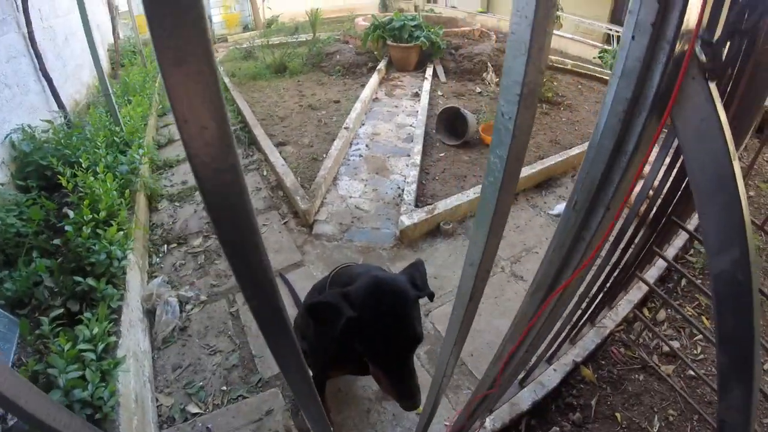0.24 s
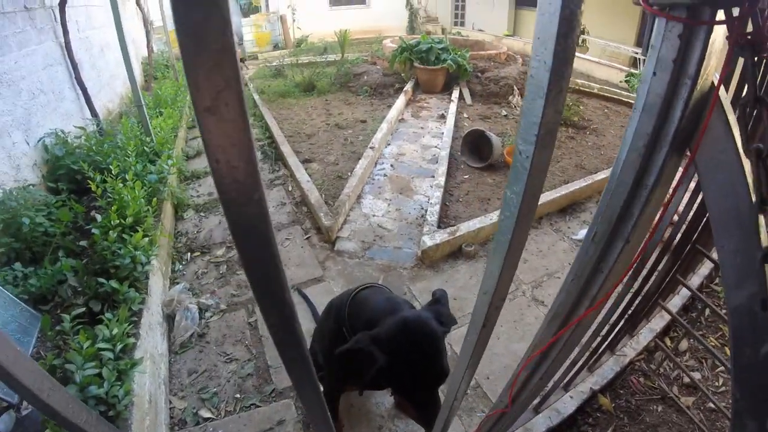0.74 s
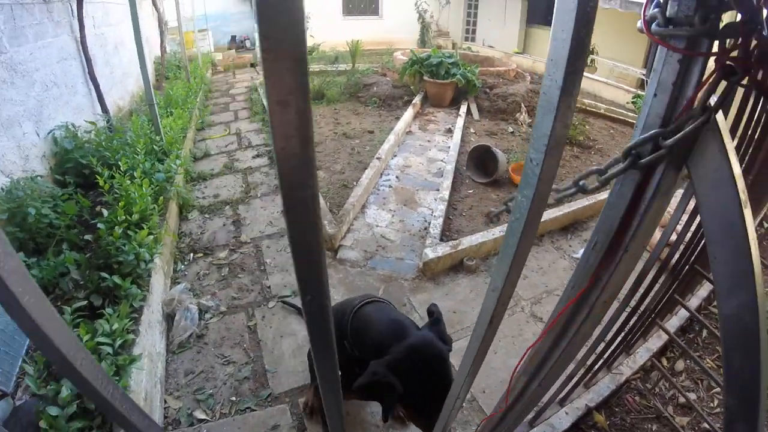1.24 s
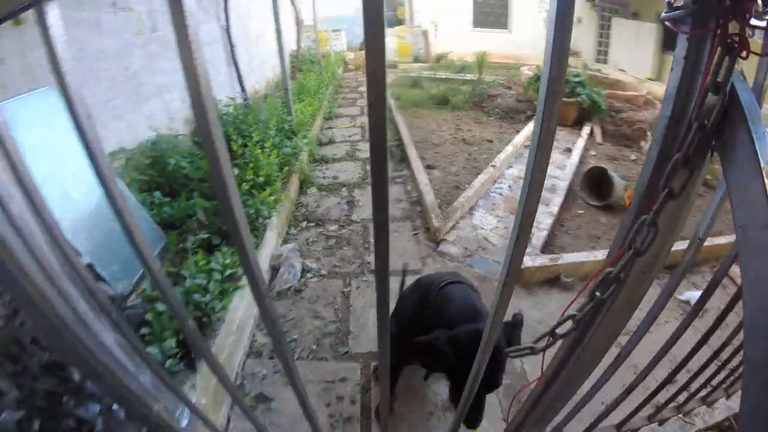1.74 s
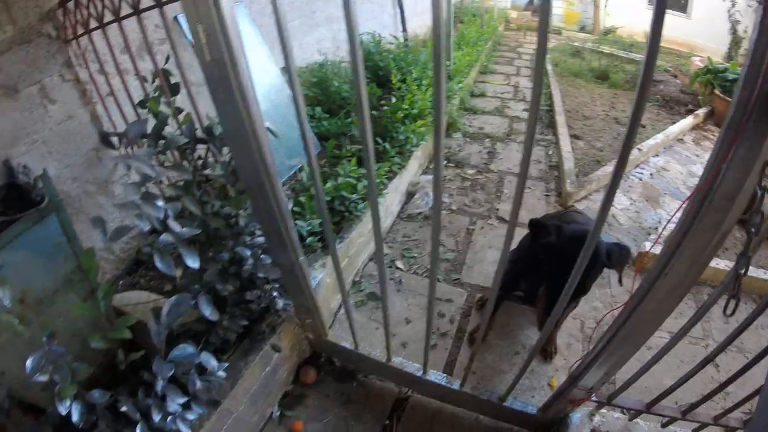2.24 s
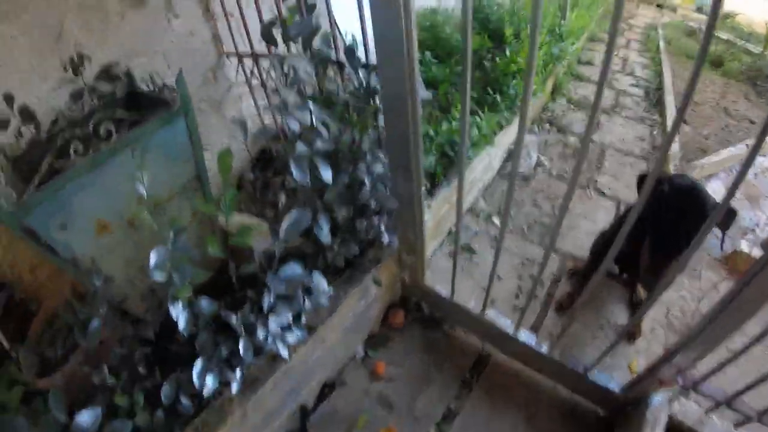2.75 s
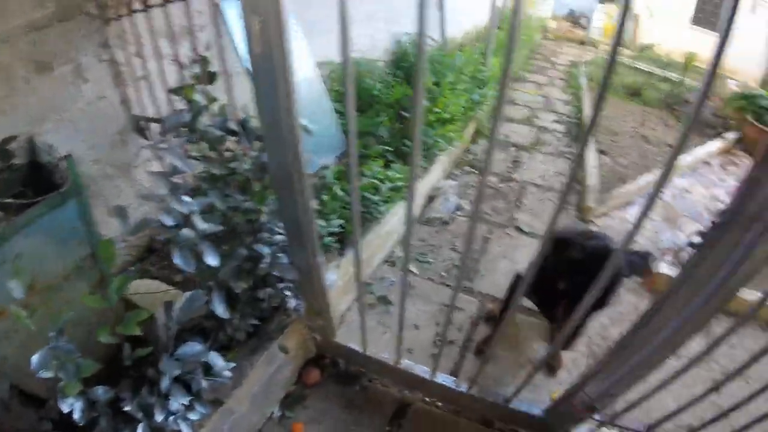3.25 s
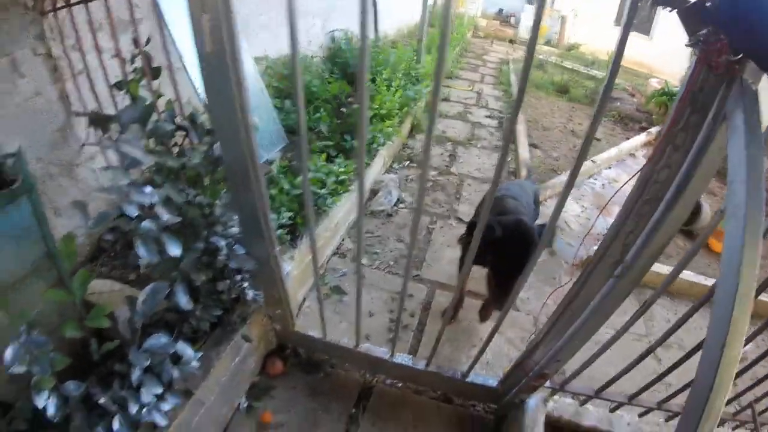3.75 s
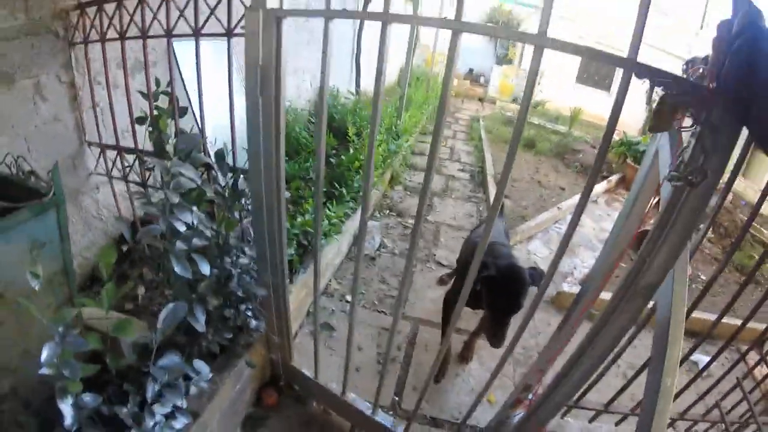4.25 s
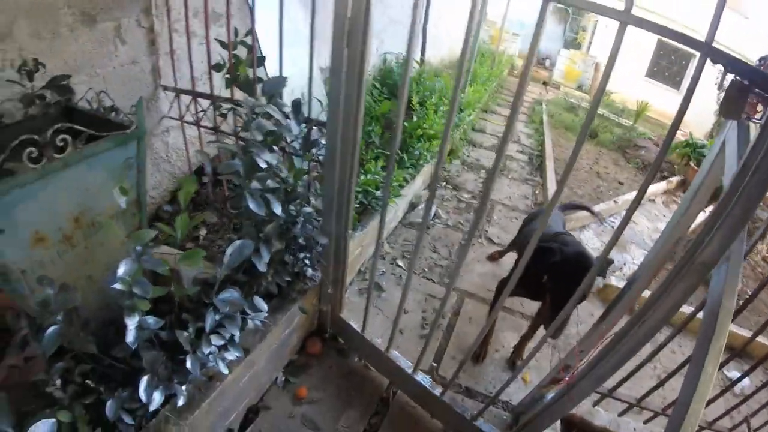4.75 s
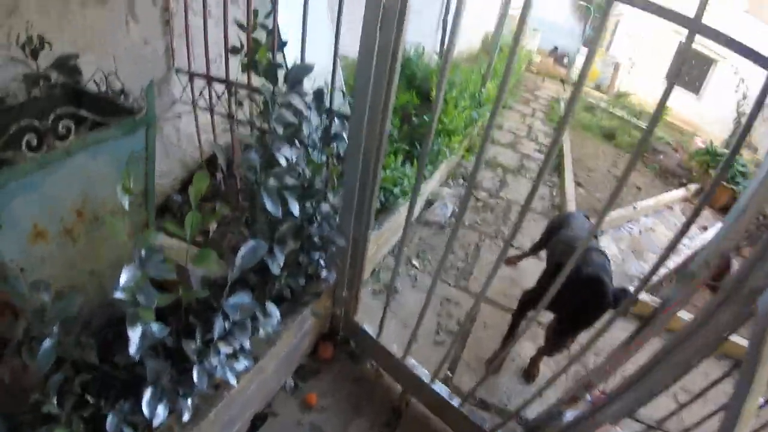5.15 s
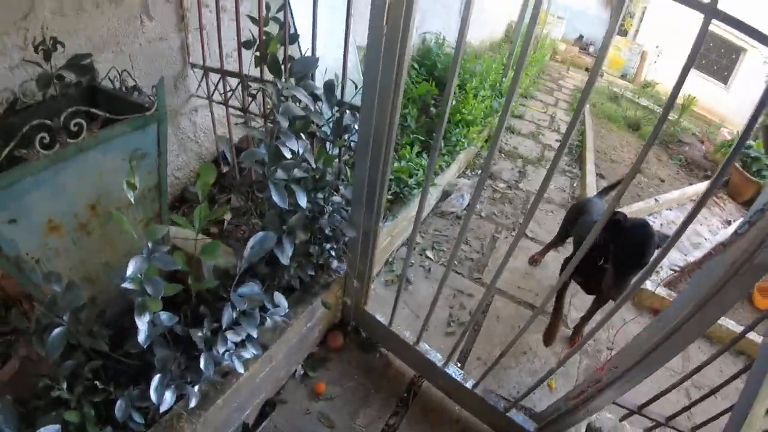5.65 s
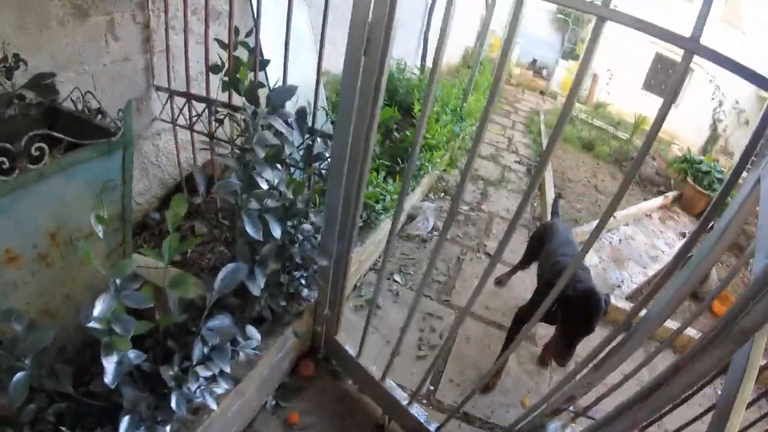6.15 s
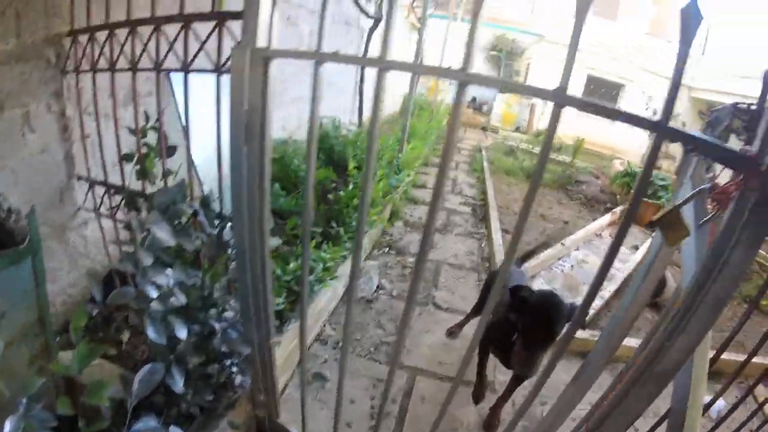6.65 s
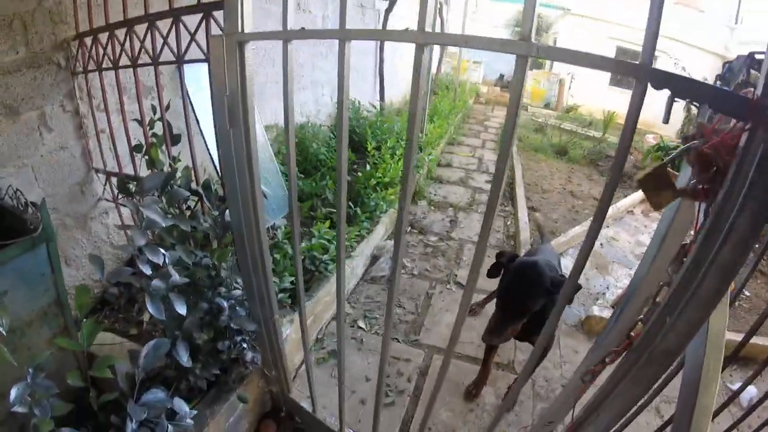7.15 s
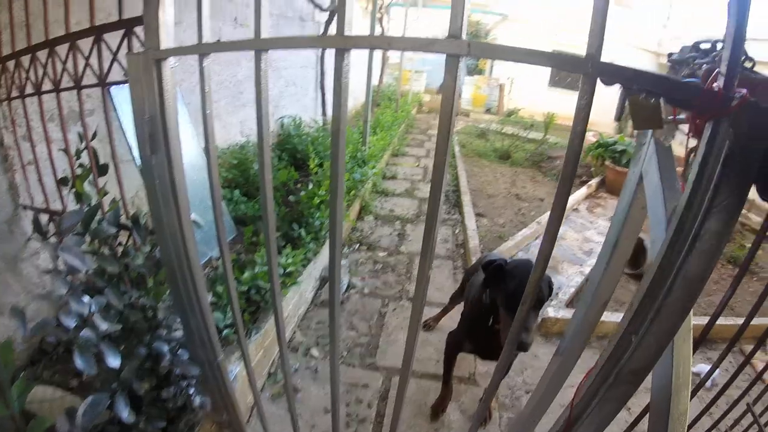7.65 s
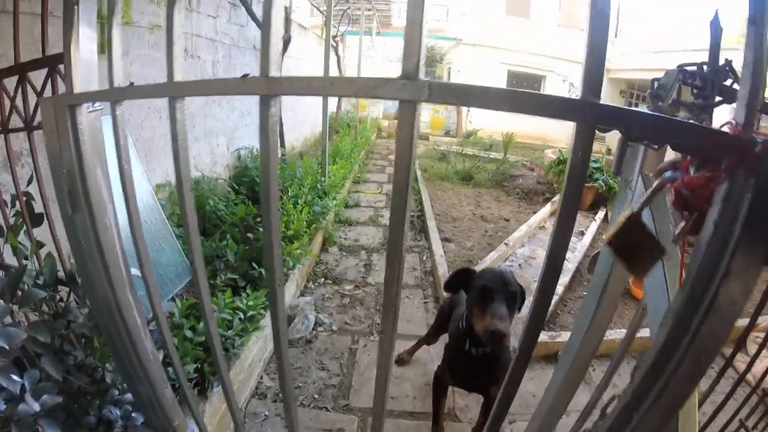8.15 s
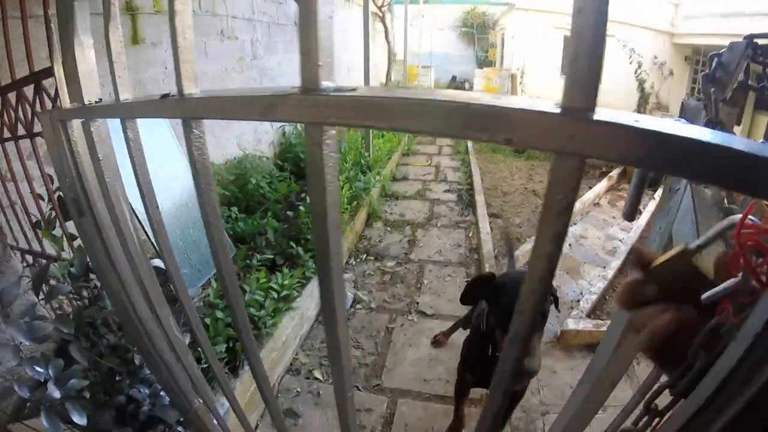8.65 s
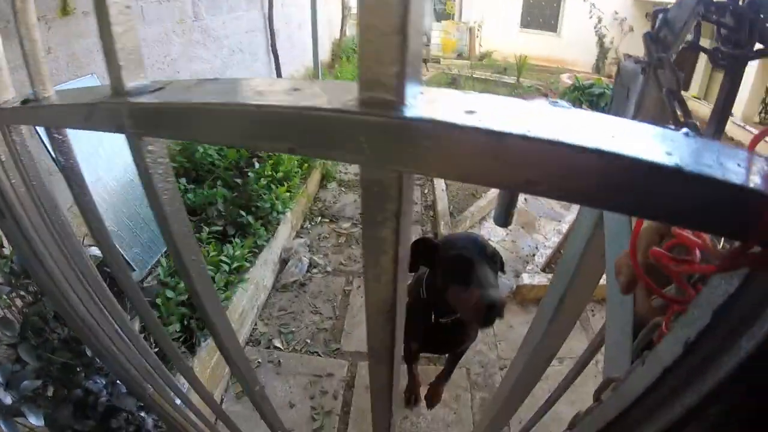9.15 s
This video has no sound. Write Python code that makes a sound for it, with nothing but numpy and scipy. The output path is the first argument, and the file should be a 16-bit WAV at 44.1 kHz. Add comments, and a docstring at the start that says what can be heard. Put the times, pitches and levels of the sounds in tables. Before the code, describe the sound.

Close, bright clinks and short rattles come from a chain being drawn out of a barred gate, with a faint high tinkle of keys. After a pause, a loud click and thud hit the body-worn microphone, followed by a brief cloth rustle. The chain rattles harder, links knocking and ringing, and ends in a few scattered soft clinks. A quiet outdoor hush and low handling rumble lie underneath.

```python
"""A steel chain is drawn out of a barred garden gate, close to a body-worn camera in a quiet yard.
Over the outdoor hush and the wearer's low rumble, a first pull drags the chain across a bar.
Links skid, knock together and ring on, while small keys tinkle high above them.
Around 3 s the camera is bumped twice, and cloth brushes it. More pulls follow from 4 to 6 s,
rattling the links and making the gate hum. The last few clinks thin out toward 9 s."""
import sys
import numpy as np
from scipy import signal
from scipy.fft import rfft, irfft, next_fast_len
from scipy.io import wavfile

SR = 44100
rng = np.random.default_rng(int(sys.argv[2]) if len(sys.argv) > 2 else 0)


def master_out(mix):
    """Clip the mix to full scale and print it as 16-bit PCM to the path in sys.argv[1]."""
    frames = np.transpose(np.atleast_2d(mix))
    ceiling = np.clip(frames, -1, 1)
    pcm = np.round(ceiling * 32767).astype(np.int16)
    wavfile.write(sys.argv[1], SR, pcm)


N = 414523
T = np.arange(N) / SR

# Links knocking together: start_s, level_db, chatter_s, tilt_db_per_octave, link_name, ring_db, slide_s
KNOCKS = [ (.322, -32.5, .002, -2, "hanging", -60, 0.019), (0.357, -36, .019, 4, "slack", -50, 0),
          (0.399, -37.5, .028, 2, "slack", -38, 0.001), (0.501, -40.5, .003, 3, "slack", -54, 0.00063),
          (0.563, -31, .012, -1.5, "slack", -37, 0), (0.619, -32.5, .012, 5.5, "middle", -42, 0.0033),
          (.678, -33, .005, 0, "middle", -34, 0.0066), (1.032, -54.5, .005, -1, "tight", -62, 0),
          (1.162, -30.5, 0.0021, 0, "tight", -42, 0), (1.314, -47.5, .003, -1, "tight", -60, 0),
          (1.555, -22, .013, 4.5, "hanging", -33.5, 0.033), (1.57, -25.5, .024, 4.5, "bright", -34, 0.0017),
          (2.552, -33, .004, 0, "bright", -36, 0.023), (2.638, -43, .011, 2, "bright", -50, 0.0042),
          (3.332, -39, .018, -1, "tight", -48.5, 0.004), (4.053, -23, .022, 4, "bright", -41, .023),
          (4.161, -32, .029, -6, "tight", -44, 0.0041), (4.228, -32.5, .004, 3.5, "tight", -35, 0.00065),
          (4.261, -25.5, .008, -2, "hanging", -32.5, 0.00017), (4.286, -32, 0.014, -3, "bright", -37, 0.01),
          (4.412, -45, .02, -2.5, "tight", -50, 0.00078),
          (4.491, -47.5, .02, -7.5, "middle", -54.5, 0.00033),
          (4.574, -41.5, .032, -2, "tight", -65, 0.002), (4.643, -37.5, .02, 1.5, "tight", -41, 0.023),
          (4.749, -33, .01, 1, "tight", -41.5, 0.0036), (4.782, -41.5, .014, 6.5, "bright", -64, 0),
          (4.992, -30, .013, 0.5, "free", -37, 0.028), (5.348, -48.5, .01, -4.5, "tight", -65, 0),
          (5.478, -53, .01, -2, "tight", -57, 0.0017), (5.682, -51.5, .007, 2.5, "tight", -55.5, 0.0031),
          (5.723, -46.5, .015, -1, "tight", -56, 0.0021), (6.119, -40.5, .011, -1, "tight", -53, 0.00068),
          (6.346, -24, .014, 2, "end", -28, 0.0022), (6.48, -34.5, .004, 8.5, "tip", -38.5, 0.00099),
          (6.561, -36.5, .012, 1, "tip", -42.5, 0), (6.739, -39.5, .005, -4.5, "tip", -46.5, 0.0014),
          (7.195, -50, .01, 7, "hanging", -53.5, 0.014), (7.292, -43, .02, 2, "last", -50.5, 0.0024),
          (7.999, -47.5, .0075, 11, "last", -50.5, 0), (8.158, -38.5, .008, 5, "hanging", -35.5, 0.0017),
          (8.35, -50.5, .01, -3, "last", -47, 0), (8.893, -56.5, .012, -9, "hanging", -70, 0)]


def undb(db):
    """Turn decibels into a gain."""
    return 10 ** (np.asarray(db) / 20)


def unit(x, size=None):
    """Scale x so that its first size samples (all by default) have an average (rms) level of 1."""
    return x / np.sqrt(np.mean(x[:size] ** 2) + 1e-20)


def add(out, start_s, x):
    """Mix x into out from start_s on."""
    i = int(start_s * SR)
    out[i:i + len(x)] += x[:N - i]


def gain_at(hz, points):
    """Read the gain at hz from a curve of (pitch_hz, level_db) points."""
    pitch_hz, level_db = np.transpose(points)
    return undb(np.interp(np.log(hz + 1), np.log(pitch_hz), level_db))


def colour(x, points):
    """Shape the lows and highs of x with such a curve; the result has level 1."""
    size = next_fast_len(N)
    hz = np.arange(size // 2 + 1) * SR / size
    return unit(irfft(rfft(x, size) * gain_at(hz, points), size)[:N])


def ring(modes, seconds):
    """A struck object rings at its own pitches, called modes; each fades by 60 dB in decay_s."""
    t = T[:int(seconds * SR)]
    hz, db, decay_s = np.transpose(modes)[:, :, None]
    tones = undb(db - 60 * t / decay_s) * np.sin(2 * np.pi * hz * t)
    return np.sum(tones, axis=0) / np.sqrt(np.sum(undb(db) ** 2) / 2)


def contacts(per_s, spread_db):
    """Tiny taps at random times and of uneven strength."""
    taps = (rng.random(N) < per_s / SR) * rng.choice([-1, 1], N)
    return unit(taps * undb(spread_db * np.clip(rng.standard_normal(N), -2, 2)))


def touches(length_s, per_s):
    """Uneven times of touches within length_s, the first at once."""
    count = max(int(length_s * per_s), 1)
    return np.append(0, (np.arange(count) + rng.random(512)[:count]) / count) * length_s


def swells(rows):
    """A gain that rises and falls smoothly around each peak time."""
    return sum(undb(db) * np.exp(-((T - peak_s) / half_s) ** 2) for peak_s, db, half_s in rows)


def yard_hush(level_db=-57):
    """The distant outdoors is a steady, soft noise, strongest in the bass."""
    # Tone of the hush: pitch_hz, level_db
    hush_tone = [(24, -33.5), (40, 1), (158, -8.5), (207, -9), (273, -10.5), (704, -15.5), (1310, -18.5),
                 (1520, -18), (3140, -23.5), (3840, -25.5), (10900, -38.5), (14000, -43), (15500, -48)]
    return undb(level_db) * colour(rng.standard_normal(N), hush_tone)


def wearer_rumble(standing_db=-53):
    """The wearer's swaying makes the camera rumble, and each lurch swells it."""
    # Tone of the rumble: pitch_hz, level_db
    rumble_tone = [(5, 0.5), (12, 8.5), (25, 1), (50, -14), (100, -29.5), (250, -38), (600, -64)]
    # Lurches of the body: peak_s, level_db, half_length_s
    lurches = [(2.85, -45.5, .15), (3.46, -38.5, 0.12), (4.19, -34.5, 0.093), (5.2, -50, 0.25),
               (6.06, -39, 0.086), (6.72, -45.5, 0.072), (8.93, -44, .08)]
    return (undb(standing_db) + swells(lurches)) * colour(rng.standard_normal(N), rumble_tone)


def link_blows(crack_db=-5.5, crack_decay_s=0.041, decay_at_3khz_s=.19, count=40, mode_count=340):
    """A set of single hits on the chain, each a short crack plus many fast-fading steel modes."""
    # Tone of all the touching links together: pitch_hz, level_db
    steel_tone = [(400, -53), (1000, -36.5), (1250, -14.5), (1420, 7.5), (1620, 3), (1950, -11),
                  (2300, -1.5), (2750, 2), (3600, 4.5), (5300, -7.5), (6400, 0.5), (8500, -2.5),
                  (9700, -8.5), (15500, -26.5)]
    t = T[:SR * 2 // 5]
    place = (np.arange(mode_count) + rng.random(mode_count)) / mode_count
    hz = 1200 + 6000 * place + 7500 * place ** 2
    spacing = 6000 + 15000 * place  # high modes lie further apart, so each carries more energy
    decay_s = decay_at_3khz_s * (hz / 3000) ** -0.51  # high modes die sooner
    decay_s *= undb(0.46 * rng.standard_normal(mode_count))
    modes = np.exp(-np.log(1000) * t / decay_s[:, None]) * np.sin(2 * np.pi * hz[:, None] * t)
    # each contact point favours a few modes, which gives every clink its own pitch
    signs = rng.choice([-1, 1], (count, mode_count))
    mix = signs * undb(5.5 * np.clip(rng.standard_normal(signs.shape), -2, 1.7))
    rings = (mix * gain_at(hz, steel_tone) * np.sqrt(spacing)) @ modes
    noise = colour(rng.standard_normal(N), steel_tone)
    fade = undb(crack_db - 60 * t / crack_decay_s)
    cracks = [fade * noise[i:i + len(t)] for i in rng.integers(0, N - len(t), count)]
    return np.array([unit(tone, size=SR // 100) + crack for tone, crack in zip(rings, cracks)])


def effort(full_speed_s, run_up_s, hold_s, fall_db_per_s, rise_db=24.5):
    """The gain of one pull over time: it gathers speed, holds, and dies away."""
    before_s = np.maximum(full_speed_s - T, 0)
    after_s = np.maximum(T - full_speed_s - hold_s, 0)
    return undb(-rise_db * before_s / run_up_s - fall_db_per_s * after_s)


def chain_drag(blows, count=6):
    """Pulled links tumble over a bar in a dense rattle, while the gate hums in its low modes."""
    # Pulls on the chain: full_speed_s, run_up_s, hold_s, rattle_db, hum_db
    pulls = [(0.263, 0.095, 0.068, -44.5, -65), (4.079, .04, .17, -32.5, -46.5),
             (4.623, .05, .17, -61, -56), (6, 0.095, 0.031, -37, -52.5)]
    # Modes of the gate's bars: pitch_hz, width_hz, level_db
    bar_modes = [(294.4, 19, -13.5), (309, 26, -4), (414, 35, -16.5), (794, 54, -10), (924, 75, -10),
                 (1290, 100, -1.5)]
    rattle_gain = sum(undb(db) * effort(*timing, fall_db_per_s=274) for *timing, db, _ in pulls)
    hum_gain = sum(undb(db) * effort(*timing, fall_db_per_s=51) for *timing, _, db in pulls)
    rattle, hum = np.zeros(N), np.zeros(N)
    for blow in blows[:count]:
        taps = contacts(per_s=27, spread_db=5) * rattle_gain
        rattle += signal.oaconvolve(taps, blow / np.linalg.norm(blow))[:N]
    shoves = contacts(per_s=600, spread_db=1)
    for hz, width_hz, db in bar_modes:
        resonance = signal.iirpeak(hz, hz / width_hz, fs=SR)
        hum += undb(db) / np.sqrt(width_hz) * signal.lfilter(*resonance, shoves)
    return rattle / np.sqrt(count) + unit(hum) * hum_gain


def link_slides(blows, scatter_db=3, first_db=4, rise_db=6):
    """A link may catch its neighbour and skid along it, ever harder, just before it knocks."""
    out = np.zeros(N)
    for knock_s, knock_db, *_, slide_s in KNOCKS:
        if slide_s > 0:
            skid = np.zeros(SR // 2)
            for delay, (which, force) in zip(touches(slide_s, per_s=200), rng.random((64, 2))):
                db = scatter_db * (2 * force - 1) + first_db * (delay == 0) + rise_db * delay / slide_s
                add(skid, delay, undb(db) * blows[int(which * len(blows))])
            skid_db = -27 + .48 * knock_db  # louder knocks have louder skids
            add(out, knock_s - slide_s, undb(skid_db) * unit(skid, size=SR // 100 + int(slide_s * SR)))
    return out


def knock_tone(x, tilt_db_per_octave, link):
    """Each knock has its own brightness, and each link adds its own tone."""
    # Centres of the links' groups of modes: pitch_hz
    group_hz = (1450, 2600, 3600, 4900, 6800, 12000)
    # How each link shares a knock among those groups: link_name -> level_db for each group
    group_db = {"end": (-0.82, -1.4, 0.17, 1, -1.7, -2.7), "tip": (-3, 1, 3.5, -1.5, 4.5, -4.5),
                "slack": (-3.5, 2.5, -2, 4.5, -2, -2), "middle": (2, -5, 1.5, 5, -1.5, -0.5),
                "bright": (-2.5, -1.5, 6, 1.5, 0.5, -2), "tight": (-1, -1, 1, -1, 1, -1),
                "free": (-0.11, 2, -3.7, 2, -1.5, 0.41), "hanging": (-3.5, -1.5, 3, 3, 1, -9),
                "last": (11, 5, 4, 4.5, 3.5, -9)}
    size = next_fast_len(len(x) + SR // 100)
    hz = np.clip(np.arange(size // 2 + 1) * SR / size, 1000, 12000)
    tilt = undb(tilt_db_per_octave * np.log2(hz / 4000))
    tone = gain_at(hz, list(zip(group_hz, group_db[link])))
    return irfft(rfft(x, size) * tilt * tone, size)[:len(x)]


def link_ring(link, twin_db=-9, split_hz=30, swing_db=5.0, swing_hz=11):
    """A freed link rings on. Each mode pulses against a weaker twin and wavers as the link swings."""
    # Modes of the links that hang free: link_name -> rows of pitch_hz, level_db, decay_s
    link_modes = { "end": [(1502.2, -1, 1.9), (2179, -26, 1.2), (2500, 5.5, 0.45), (2552, 2, 0.71),
                  (2743, 3.5, 0.37), (2820, -22, 1.7), (3450, -21, 1.7), (4150, -32, .45), (4970, -5, 0.4),
                  (5038, -2.5, 0.36), (5862, -8, 0.46), (6940, -22, 0.59)], "tip": [(1525, -2, 0.71),
                  (2180, -3, 0.42), (2463, 1.5, 0.39), (3340, 2.5, 0.29), (7200, -7, 0.29),
                  (7100, -16, 0.51)], "slack": [(1330, -23, 0.72), (2925, -5, 0.58), (2880, 1, 0.48),
                  (3350, -2, 0.25), (4680, -4.5, 0.1), (5700, -10, 0.32)], "middle": [(1460, -6, 0.61),
                  (1566, -10, 0.82), (2498, -1.5, 1), (2475, -7, 1), (2573, -5, 0.52), (2750, 0, 0.55),
                  (2860, -6, 0.51), (2940, -6.5, .45), (6300, 1, 0.14)], "bright": [(1500, -18, 0.95),
                  (2493, -15, 0.23), (3500, 4, 0.54), (3510, -12, 1), (3563, -1, 0.58), (3700, -3, 0.38),
                  (4640, -23.5, 0.54), (6400, -24, .35), (7070, -20, .52)], "tight": [(1610, -2.5, 0.34),
                  (1598, -3.5, 0.63), (2840, -4.5, 0.45), (3300, -4.5, 0.21), (3430, -0.5, .2),
                  (4680, -6, 0.201), (5970, -11, 0.19)], "free": [(1495, -6.5, 3.5), (2509, -5.5, 0.7),
                  (2830, -1, 0.34), (4000, -6, 0.18), (4950, -4, 0.35), (5035, 4.5, 0.31), (6000, -3, 0.31),
                  (8500, -4, 0.26)], "hanging": [(1445, -5, 0.2), (1495, -37, 0.56), (3600, -3.5, 0.42),
                  (3709, 6.5, 0.25), (3838, 0, 0.24), (7170, -25, 0.47)], "last": [(1446, -0.5, 0.22),
                  (2160, -9.5, 0.61), (2320, -13, 0.38), (2570, -7, 0.31), (2905, -5.5, 0.4),
                  (3454, 0.5, 0.14)]}
    modes = link_modes[link]
    longest_s = max(decay_s for _, _, decay_s in modes)
    t = T[:int(min(longest_s, 1.5) * SR)]
    out = np.zeros(len(t))
    for (hz, db, decay_s), (split, pace, phase) in zip(modes, rng.random((len(modes), 3))):
        twin_hz = hz + split_hz * (2 * split - 1)
        pair = np.sin(2 * np.pi * hz * t) + undb(twin_db) * np.sin(2 * np.pi * twin_hz * t)
        waver_db = swing_db * np.sin(2 * np.pi * (swing_hz * (.5 + pace) * t + phase))
        out += undb(db + waver_db - 60 * t / decay_s) * pair
    return out / np.sqrt(sum(undb(db) ** 2 for _, db, _ in modes) / 2)


def link_clinks(blows, scatter_db=3, first_db=5, snap_db=-1, snap_s=0.0091, lowest_hz=1250, hits=6):
    """Each knock is a quick chatter between three neighbouring links and leaves one link ringing."""
    out = np.zeros(N)
    for start_s, db, chatter_s, tilt, link, ring_db, _ in KNOCKS:
        span = int(chatter_s * SR)
        delays = np.append(0, (np.arange(hits - 1) + rng.random(hits - 1)) / (hits - 1)) * chatter_s
        strengths = undb(np.append(first_db, scatter_db * rng.standard_normal(hits - 1)))
        neighbours = np.resize(rng.choice(len(blows), size=3, replace=False), hits)
        burst = np.zeros(SR // 2 + span)
        for delay, strength, which in zip(delays, strengths, neighbours):
            add(burst, delay, strength * blows[which])
        # links are loudest while they touch; the pull on the chain then damps them at once
        burst *= 1 + undb(snap_db) * np.exp(-T[:len(burst)] / (chatter_s + snap_s))
        add(out, start_s, undb(db) * unit(knock_tone(burst, tilt, link), size=SR // 80 + span))
        add(out, start_s + chatter_s / 4, undb(ring_db) * link_ring(link))
    # a link is too small to give off sound below its lowest mode
    return signal.sosfilt(signal.butter(6, lowest_hz, "high", fs=SR, output="sos"), out)


def key_tinkles(tick_db=-7, spread_hz=50, scatter_db=4, attack_s=.0012):
    """Small keys touch a few times in a row, each time with a tick and a very high ring."""
    # Shakes of the bunch of keys: start_s, length_s, level_db
    shakes = [(.33, 0.11, -52), (0.606, 0.022, -51), (1.003, .03, -53), (4.173, .02, -46),
              (4.603, 0.25, -58), (4.914, .13, -57), (5.363, 0.022, -55), (5.967, .12, -42.5),
              (6.099, .46, -55.5)]
    # Modes of a key: pitch_hz, level_db, decay_s
    key_modes = [(13500, -3, 0.15), (13700, 1, .17), (14010, -7, .25), (14200, -11, 0.174),
                 (14750, -11.5, 0.198)]
    # until the hand lets go of the chain, every knock also jolts the keys
    let_go_s, jolt_s, softer_db = 6.65, .03, 26
    jolts = [(start_s, jolt_s, db - softer_db) for start_s, db, *_ in KNOCKS if start_s < let_go_s]
    out = np.zeros(N)
    for start_s, length_s, db in shakes + jolts:
        span = int(length_s * SR)
        burst = np.zeros(SR // 2 + span)
        strengths = undb(scatter_db * rng.standard_normal(128))
        detunes_hz = spread_hz * rng.standard_normal((128, len(key_modes)))
        ticks = undb(tick_db) * np.diff(rng.standard_normal((128, SR // 2000)))
        for i, delay in enumerate(touches(length_s, per_s=70)):
            modes = [(hz + detune, *rest) for (hz, *rest), detune in zip(key_modes, detunes_hz[i])]
            touch = ring(modes, seconds=0.27)
            touch *= 1 - np.exp(-T[:len(touch)] / attack_s)
            add(touch, 0, ticks[i])
            add(burst, delay, strengths[i] * touch)
        add(out, start_s, undb(db) * unit(burst, size=SR // 50 + span))
    return out


def wall_echo(x, echo_db=-12, decay_s=0.35, first_s=0.0024):
    """The paving and the house walls add a short, thin echo."""
    t = T[:SR // 2]
    echo = rng.standard_normal(len(t)) * undb(-60 * t / decay_s) * (t > first_s)
    echo = signal.sosfilt(signal.butter(1, 6000, fs=SR, output="sos"), echo)
    return x + undb(echo_db) * signal.oaconvolve(x, echo / np.linalg.norm(echo))[:N]


def camera_bumps(click_band_hz=(900, 8000)):
    """A bump thuds through the camera's mount and makes its case click."""
    # Hits on the camera, all but the first in one quick cluster: time_s, thud_db, push_s, click_db
    bumps = [(2.878, -26.5, 0.0022, -39.5), (3.456, -21, 0.0027, -22), (3.46, -18.5, 0.0046, -18),
             (3.4674, -53, 0.0034, -17), (3.4702, -22.5, 0.0026, -7)]
    # Modes of the mount and of the case: pitch_hz, level_db, decay_s
    mount_modes = [(45, -33, .07), (150, 3.5, 0.024), (254, 3.5, 0.012)]
    case_modes = [(1480, -34, .022), (1820, 10, 0.027), (2870, 8, 0.015), (3200, 17, 0.0045),
                  (5430, 18, 0.001), (8550, 15, 0.001)]
    thud = ring(mount_modes, seconds=.12)
    band = signal.butter(2, click_band_hz, "band", fs=SR, output="sos")
    click = signal.sosfilt(band, ring(case_modes, seconds=.05))
    out = np.zeros(N)
    for time_s, thud_db, push_s, click_db in bumps:
        soft_thud = np.convolve(thud, np.hanning(int(push_s * SR)))  # a longer push sounds duller
        add(out, time_s - push_s / 2, undb(thud_db) * soft_thud / np.abs(soft_thud).max())
        add(out, time_s, undb(click_db) * click / np.abs(click).max())
    return out


def cloth_brush():
    """Cloth rubs the camera: a crowd of tiny taps blurs into a rustle."""
    # Strokes of the cloth: peak_s, level_db, half_length_s
    strokes = [(3.495, -46, 0.044), (3.585, -41, 0.025), (3.71, -48.5, 0.071), (3.815, -51.5, 0.018)]
    # Tone of the rustle: pitch_hz, level_db
    cloth_tone = [(600, -25), (1200, -11), (1600, 3.5), (2150, -7), (2700, 2.5), (3600, -13.5), (5000, -20),
                  (7000, -18.5), (10000, -29), (15000, -38)]
    return colour(contacts(per_s=2500, spread_db=5), cloth_tone) * swells(strokes)


def scene():
    """Mix the echoing chain, gate and keys with the hush and the camera's own noises, in mono."""
    blows = link_blows()
    metal = wall_echo(link_clinks(blows) + link_slides(blows) + chain_drag(blows) + key_tinkles())
    return (metal + yard_hush() + camera_bumps() + cloth_brush() + wearer_rumble())[None]


def record(dry, top_hz=15500):
    """The camera cuts off the highest treble."""
    return signal.sosfilt(signal.ellip(8, .2, 70, top_hz, fs=SR, output="sos"), dry)


dry = scene()
out = record(dry)
master_out(out)
```